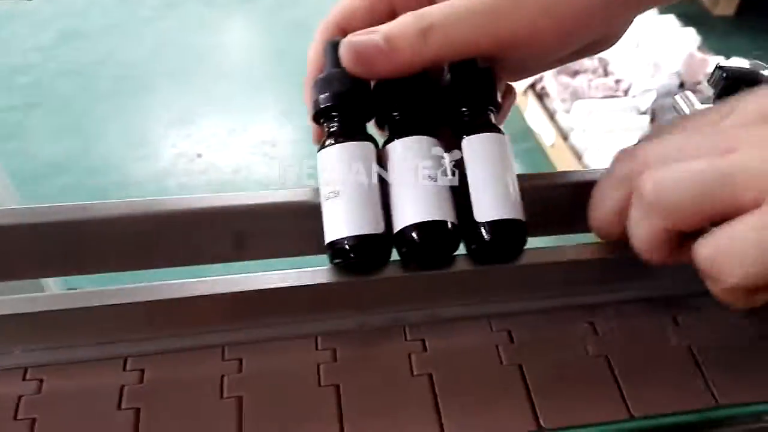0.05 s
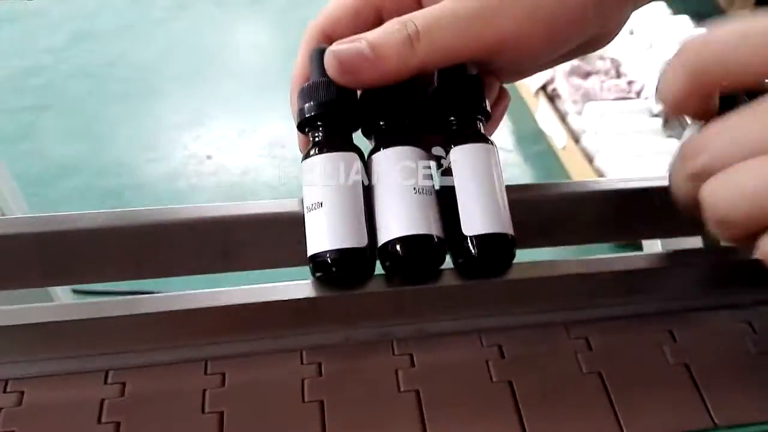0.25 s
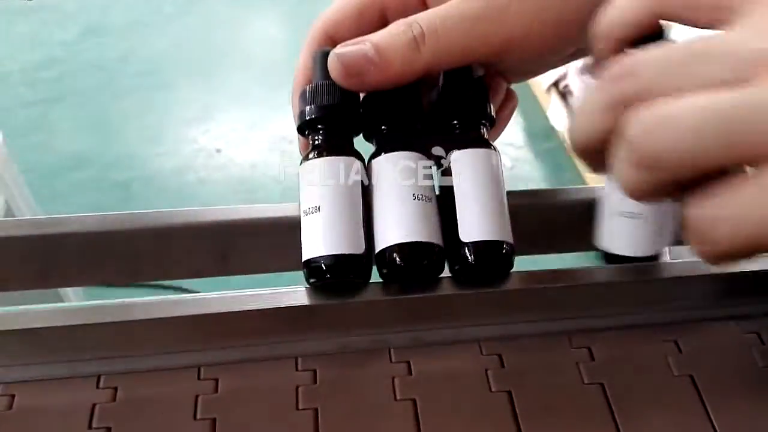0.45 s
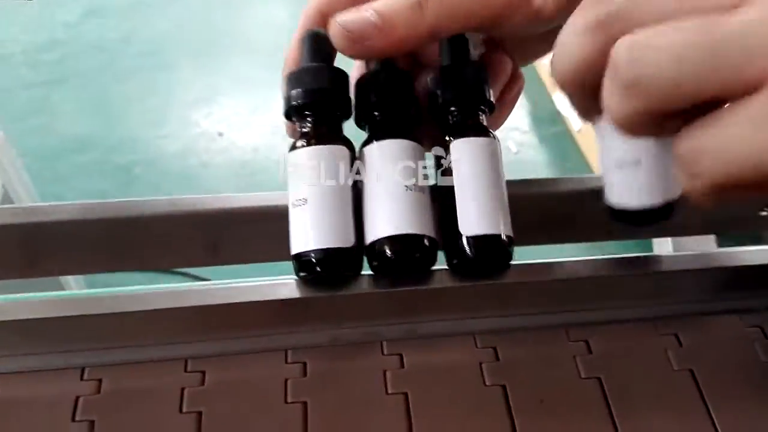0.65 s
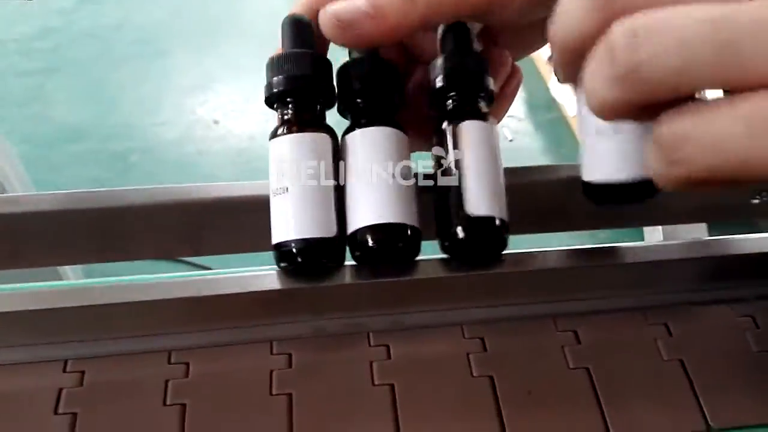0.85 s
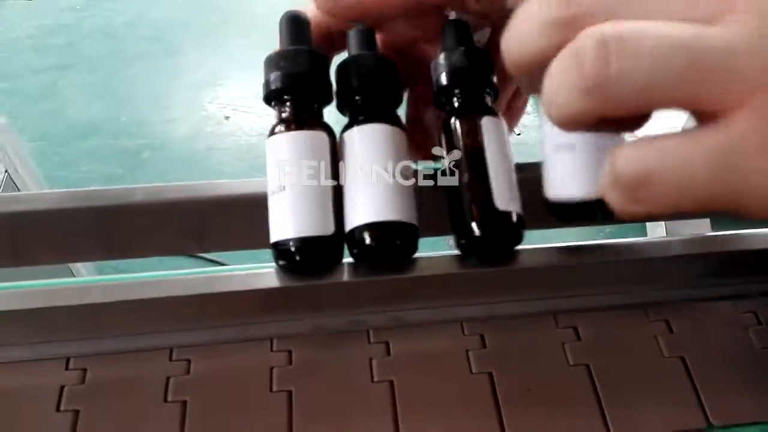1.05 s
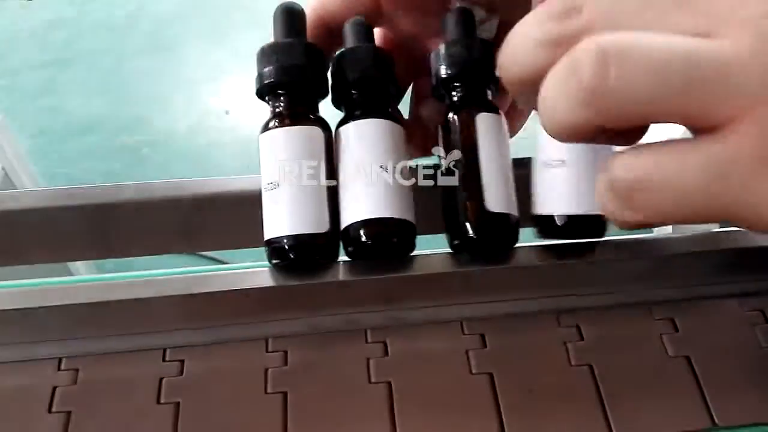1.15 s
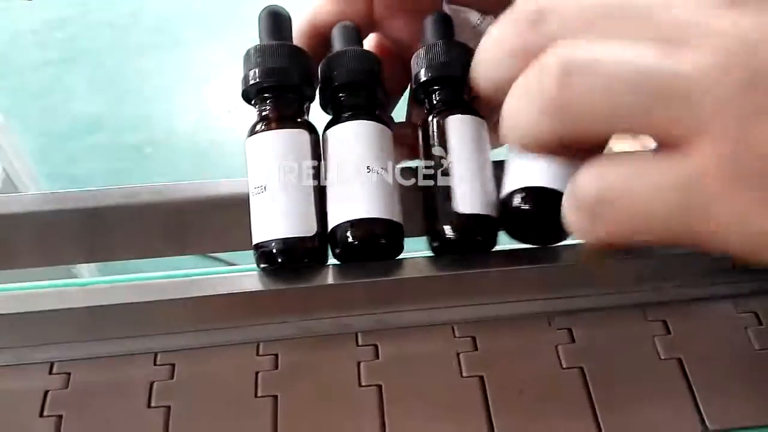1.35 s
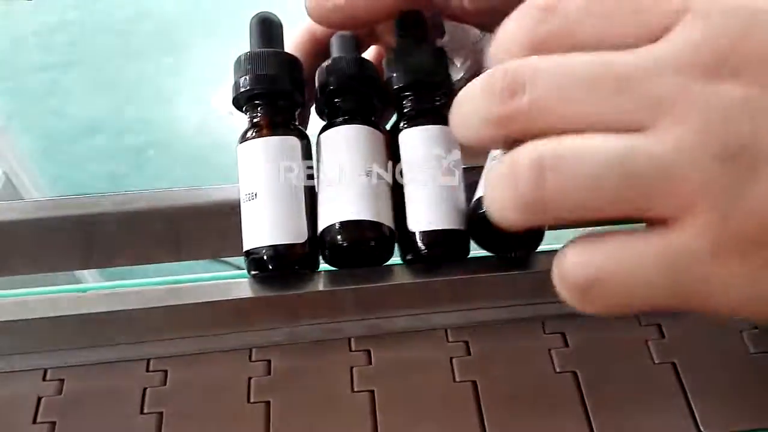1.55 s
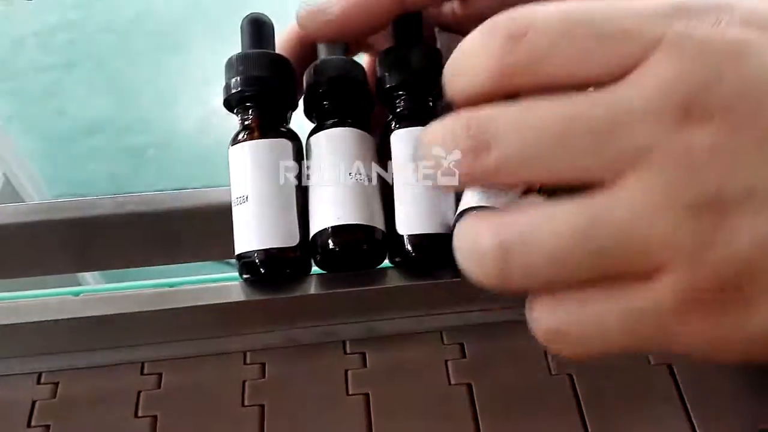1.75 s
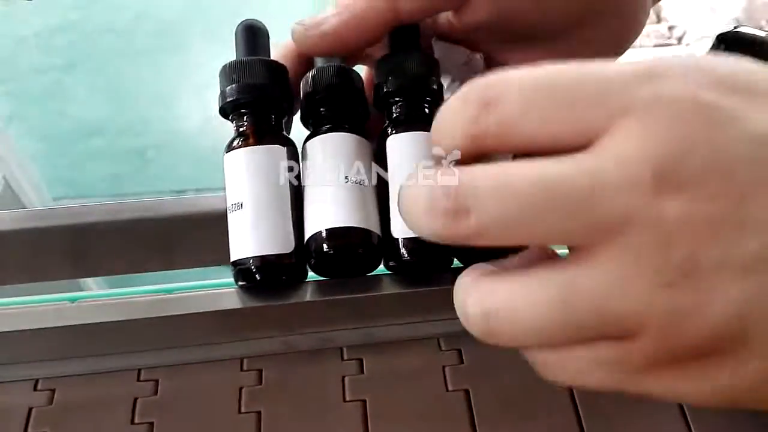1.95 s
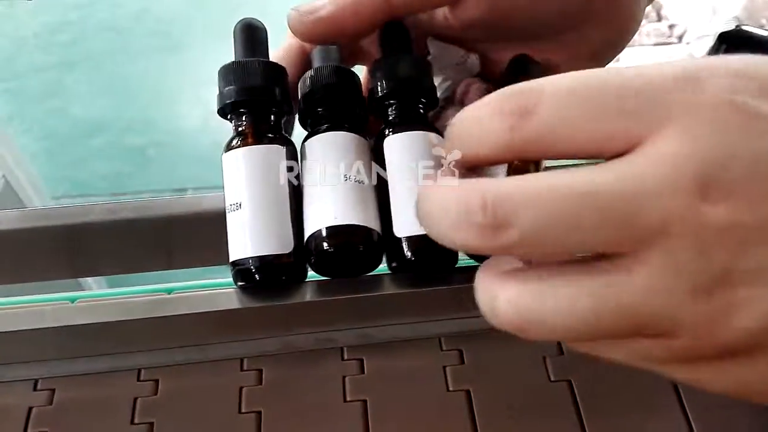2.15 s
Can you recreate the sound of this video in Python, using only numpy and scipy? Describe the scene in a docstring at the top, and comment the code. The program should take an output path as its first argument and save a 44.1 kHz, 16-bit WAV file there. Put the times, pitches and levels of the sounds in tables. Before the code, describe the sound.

Small glass bottles clink close by as they are set on a steel rail, in about ten uneven, briefly ringing contacts with a few soft hand knocks. Machinery hisses and hums throughout the hall, whining briefly near the start.

```python
"""A machine hall, beside a conveyor: small glass dropper bottles are lined up on a steel rail close by.
Machinery hisses, hums and rumbles throughout, with one brief whine. Each bottle contact gives a crack,
a dense clatter and the ringing modes of glass and rail. Hands make a few soft knocks, and a low thump
lies under the first loud clink. The right microphone port hears everything later and muffled."""
import sys
import numpy as np
from scipy import signal
from scipy.fft import rfft, irfft, next_fast_len
from scipy.io import wavfile
from scipy.ndimage import uniform_filter1d, minimum_filter1d, map_coordinates

SR = 44100
rng = np.random.default_rng(int(sys.argv[2]) if len(sys.argv) > 2 else 0)


def wrap_up_sound(samples):
    """Save the sound to the file named by the first command line argument, as 16-bit audio."""
    columns = np.atleast_2d(samples).T
    # keep every value between -1 and 1, then stretch to whole-number steps
    tamed = np.clip(columns, -1, 1)
    steps = np.round(tamed * 32767).astype(np.int16)
    wavfile.write(sys.argv[1], SR, steps)


N = 97020


def amp(db):
    """Decibels to gain."""
    return 10 ** (np.asarray(db) / 20)


def along(points, hz):
    """Interpolate (freq_hz, value) points on a log axis."""
    freq_hz, values = np.transpose(points)
    return np.interp(np.log(hz + 1), np.log(freq_hz + 1), values)


def curves(rows, outside=None):
    """One value per sample for each column after time_s."""
    time_s, *columns = np.transpose(rows)
    return [np.interp(np.arange(N) / SR, time_s, c, left=outside, right=outside) for c in columns]


def wobble(rate_hz):
    """Smooth random curve, rate_hz knots a second."""
    knots = rng.standard_normal(int(N * rate_hz / SR) + 4)
    return map_coordinates(knots, [np.arange(N) * rate_hz / SR])


def filtered(x, response):
    """Apply a frequency response."""
    size = x.shape[-1]
    padded = next_fast_len(size + SR // 8)
    return irfft(rfft(x, padded) * response(np.fft.rfftfreq(padded, 1 / SR)), padded)[..., :size]


def fade(t, t60_s):
    """Exponential decay."""
    return np.exp(-np.log(1000) * t / np.maximum(t60_s, 1e-3))


def rise(t, attack_s):
    """Exponential onset."""
    return 1 - np.exp(-t / attack_s)


def add(track, start_s, sound):
    """Mix a sound into the track."""
    part = track[:, round(start_s * SR):][:, :sound.shape[-1]]
    part += sound[..., :part.shape[1]]


# Likeness of the two ports: freq_hz, correlation
PORT_CORRELATION = [(100, 1), (300, 1), (700, 0.59), (1500, 1), (3000, 0.23), (8000, .05)]

def noise(spectrum_db, size=N):
    """Coloured noise of rms 1, alike at both ports in the bass, unrelated in the treble."""
    def mid_side_gains(hz):
        angle = np.arccos(along(PORT_CORRELATION, hz)) / 2
        return amp(spectrum_db(hz)) * [np.cos(angle), np.sin(angle)]
    mid, side = filtered(rng.standard_normal((2, size)), mid_side_gains)
    ports = np.array([mid + side, mid - side])
    return ports / np.sqrt(np.mean(ports ** 2) + 1e-20)


# Machinery levels: time_s, hiss_db, hum_db
HISS_HUM_LEVELS = [(0, -44, -49.5), (.07, -41, -53), (.13, -36.5, -51), (.2, -39, -51.5), (.5, -38, -46),
                   (.74, -38.5, -40.5), (.83, -40, -44.5), (.88, -38.5, -50), (1.08, -40.5, -48),
                   (1.45, -39.5, -50.5), (1.66, -41.5, -49), (1.73, -40.5, -51.5), (1.8, -39, -43.5),
                   (1.92, -34.5, -42), (2.1, -39, -40), (2.2, -38, -44)]
# Rumble level: time_s, level_db
RUMBLE_LEVEL = [(0, -55), (.45, -56.5), (.8, -61), (1.03, -57), (1.3, -64.5), (1.65, -56.5), (1.8, -75),
                (2.1, -53), (2.2, -48)]
# Noise spectra: freq_hz, relative_db
HISS_SPECTRUM = [(100, -6.5), (400, -19), (700, -1.5), (1100, -0.5), (1450, -1), (2200, -2.5), (3500, -5),
                 (5800, -5), (7000, -14.5), (8200, -24), (10000, -37), (12500, -61), (15000, -66)]
HUM_SPECTRUM = [(100, -56), (200, -7), (320, 1.5), (440, 6), (540, -1.5), (800, -13.5), (2000, -64.5)]
RUMBLE_SPECTRUM = [(15, -0.5), (45, -0.5), (80, -14.5), (150, -27), (300, -9.5), (900, -42)]

def machinery():
    """Machines across the hall: three bands of noise, each wavering in level."""
    hiss_db, hum_db = curves(HISS_HUM_LEVELS)
    rumble_db, = curves(RUMBLE_LEVEL)
    hiss = amp(hiss_db + .6 * wobble(rate_hz=25)) * noise(lambda hz: along(HISS_SPECTRUM, hz))
    hum = amp(hum_db + 1.8 * wobble(rate_hz=14.4)) * noise(lambda hz: along(HUM_SPECTRUM, hz))
    rumble = amp(rumble_db + .97 * wobble(rate_hz=8.9)) * noise(lambda hz: along(RUMBLE_SPECTRUM, hz))
    return hiss + hum + rumble


# Machinery whine: time_s, level_db
WHINE_LEVEL = [(.19, -60), (.215, -35.5), (.275, -31.5), (.293, -53), (0.302, -24.5), (.322, -33.5),
               (.332, -33), (.39, -35), (.53, -38.5), (.62, -49)]

def whine(centre_hz=826, wander_hz=20, flutter_db=1.8):
    """A brief, narrow machine tone, unsteady in pitch and level."""
    level_db, = curves(WHINE_LEVEL, outside=-np.inf)
    gain = amp(level_db + flutter_db * wobble(rate_hz=60))
    pitch_hz = centre_hz + wander_hz * wobble(rate_hz=130)
    return gain * np.sin(2 * np.pi * np.cumsum(pitch_hz) / SR)


def tilt_db(hz, tilt_db_per_oct, pivot_hz=4770):
    """A harder contact favours the high frequencies."""
    return tilt_db_per_oct * np.log2(np.clip(hz, 800, 12000) / pivot_hz)


# Dense modes of glass and steel together: freq_hz, relative_db
CLATTER_SPECTRUM = [(100, 1), (450, -26.5), (1000, -7), (1300, -13.5), (2000, -3), (3300, -2), (6500, -2),
                    (7800, -8.5), (9700, -20.5), (11500, -37.5), (14500, -53)]

def clatter(t, t60_s, crack_db, tilt_db_per_oct):
    """Crowded modes as decaying noise; a faster decay on top is the crack."""
    dense = noise(lambda hz: along(CLATTER_SPECTRUM, hz) + tilt_db(hz, tilt_db_per_oct), size=len(t))
    decay = fade(t, t60_s) + amp(crack_db) * fade(t, t60_s=.014)
    return dense * decay * rise(t, attack_s=.000068) ** 2


def ring(modes, t, tilt_db_per_oct, damping=1.242, scatter_db=1):
    """Damped modes, struck a little differently each time, with a random phase at each port."""
    out = np.zeros((2, len(t)))
    for pitch_hz, relative_db, nominal_t60_s in modes:
        phase = rng.uniform(0, 2 * np.pi, (2, 1))
        gain = amp(relative_db + tilt_db(pitch_hz, tilt_db_per_oct) + scatter_db * rng.standard_normal())
        out += gain * fade(t, nominal_t60_s / damping) * np.sin(2 * np.pi * pitch_hz * t + phase)
    return out * rise(t, attack_s=.00096)


# Four glass rings, the second of two bottles clinking together: pitch_hz, relative_db, nominal_t60_s
GLASS_1 = [(2640, -7, .18), (3205, -1, .15), (3250, 1, .14), (3930, -10, .23), (5248, -1, .22),
           (6380, -7, .2)]
GLASS_2 = [(1916, -12, .22), (2931, -13, .43), (3914, -9, .3), (4498, -10, .27), (4709, -11, .51),
           (5171, -5, .28), (5372, -7, .2), (5550, -5, .28), (5692, -8, .33), (5991, -2, .24),
           (6243, -7, .85), (6294, -16, .9), (6502, 1, .22), (6768, -1, .2), (6932, -3, .26),
           (7101, -8, .28), (7178, -8, .21), (8137, -10, .2), (8703, -15, .2), (9621, -21, .22),
           (10100, -24, .16), (11422, -30, .21), (12400, -33, .14), (13200, -33, .26)]
GLASS_3 = [(1100, -13, .17), (1897, -6, .2), (2904, -1, .18), (3520, -1, .15), (3588, -3, .16),
           (3698, -11, .3), (3985, -4, .25), (4015, -9, .35), (4743, -5, .27), (4845, -13, .35),
           (5787, -10, .22), (6388, 0, .17), (6517, -1, .17), (7671, -14, .2), (9695, -17, .16)]
GLASS_4 = [(2895, 0, .15), (3699, -4, .24), (5492, -5, .2), (6050, 0, .17), (7146, -3, .17),
           (8290, -9, .15), (9720, -12, .12), (10330, -20, .16)]
GLASS_MODES = {"first": GLASS_1, "second": GLASS_2, "third": GLASS_3, "fourth": GLASS_4}
# Steel rail: pitch_hz, relative_db, nominal_t60_s
RAIL_MODES = [(1420, -12, .28), (1916, -6, .28), (1985, -5, .2), (2945, -2, .26), (3526, -7, .18),
              (3690, -9, .28), (4092, -1, .3), (4770, -7, .3), (5185, -5, .25), (5545, -1, .28),
              (5693, 0, .28)]
# Contacts: start_s, clatter_db, crack_re_clatter_db, tilt_db_per_oct, clatter_t60_s,
# glass_db, rail_db, glass_ring
CONTACTS = [ (0.2099, -24, -1.5, -0.5, 0.19, -22, -39, "first"),
            (.356, -11.5, -8, .5, 0.18, -11, -18.5, "second"),
            (0.601, -29, -6, -3, .15, -29, -29.5, "first"),
            (0.608, -18, -13, -0.5, 0.17, -25, -36, "first"),
            (1.1322, -18, -14, 2, 0.3, -31, -14.5, "second"),
            (1.142, -14, -19, 0.5, 0.23, -17.5, -18.5, "second"),
            (1.210, -33, -8, -5, 0.18, -20.5, -24.5, "fourth"),
            (1.2305, -12.5, 16, -0.5, 0.21, -52, -19.5, "second"),
            (1.246, -17, -9, -2, 0.14, -17, -27, "third"), (1.321, -33, -19, -3.5, 0.39, -30, -34, "third"),
            (1.5294, -16.5, 1.5, 1, 0.19, -15, -32, "third"),
            (1.8026, -16, -11, 0, 0.22, -15.5, -34, "third"),
            (1.9666, -20, -2, 3.5, .16, -23, -32, "fourth"),
            (2.087, -30, -4, -6, 0.093, -53, -37, "fourth"), (2.1017, -27, 3, -5, 0.2, -59, -33, "fourth"),
            ]

def clinks(low_cut_hz=330):
    """Each contact clatters and rings the glass and the rail; small bottles radiate little bass."""
    out, t = np.zeros((2, N)), np.arange(SR * 3 // 4) / SR
    for start_s, clatter_db, crack_db, tilt_db_per_oct, t60_s, glass_db, rail_db, glass_ring in CONTACTS:
        impact = amp(clatter_db) * clatter(t, t60_s, crack_db, tilt_db_per_oct)
        glass = amp(glass_db) * ring(GLASS_MODES[glass_ring], t, tilt_db_per_oct)
        rail = amp(rail_db) * ring(RAIL_MODES, t, tilt_db_per_oct)
        add(out, start_s, in_hall(impact + glass + rail, wet_db=-19))
    return signal.sosfilt(signal.butter(3, low_cut_hz, "highpass", fs=SR, output="sos"), out)


# Knock and thump modes: start_s, level_db, pitch_hz, t60_s, attack_s
KNOCK_MODES = [(0.2821, -24, 79, 0.026, 0.00047), (0.2838, -14, 418, 0.0049, 0.00034),
               (.358, -33, 53.4, 0.19, 0.012), (1.8714, -21, 198, 0.07, 0.004),
               (1.8771, -2.5, 665, 0.02, 0.00059), (1.877, -29, 139, .06, 0.002),
               (1.906, -16, 692, 0.028, 0.0015)]

def knocks():
    """Soft hand knocks and a thump under the first loud clink: low, heavily damped modes."""
    out, t = np.zeros((2, N)), np.arange(SR // 2) / SR
    for start_s, level_db, pitch_hz, t60_s, attack_s in KNOCK_MODES:
        push = -amp(level_db) * np.sin(2 * np.pi * pitch_hz * t) * fade(t, t60_s) * rise(t, attack_s)
        add(out, start_s, in_hall(np.array([push, push]), wet_db=-11))
    return out


# Hall decay: freq_hz, t60_s
HALL_DECAY = [(100, 0.26), (700, 0.55), (2000, 0.75), (6000, 0.54), (12000, 0.24)]

def in_hall(sound, wet_db):
    """The sound plus a fresh hall tail, each frequency dying at its own rate."""
    hz, t, bands = signal.stft(rng.standard_normal((2, SR * 3 // 4)), SR, nperseg=256)
    _, tail = signal.istft(bands * fade(t, along(HALL_DECAY, hz)[:, None]), SR, nperseg=256)
    wet = signal.fftconvolve(sound, tail / np.linalg.norm(tail[0]), axes=1)
    return sound + amp(wet_db) * wet[:, :sound.shape[1]]


def scene():
    """Everything that arrives at the two ports."""
    return clinks() + knocks() + machinery() + whine()


# Right port against the left: freq_hz, gain_db
RIGHT_PORT_RESPONSE = [(30, 0), (150, 0), (250, -.5), (420, -3), (720, -10), (1300, -10), (2200, -11),
                       (3300, -11), (5400, -21), (9000, -24), (15000, -18)]
# Top-end tone (slight dip, lift near 14.5 kHz, cut-off): freq_hz, gain_db
TOP_END_TONE = [(10500, 0), (12500, -4), (14500, 9), (15300, -28)]

def record(dry, right_lag_s=.000652, ceiling_db=-.1, top_hz=15300):
    """Late, muffled right port; then top-end tone shaping, peak limiter, band limit."""
    muffled = lambda hz: amp(along(RIGHT_PORT_RESPONSE, hz))
    right = filtered(dry[1], lambda hz: muffled(hz) * np.exp(-2j * np.pi * hz * right_lag_s))
    ports = filtered(np.array([dry[0], right]), lambda hz: amp(along(TOP_END_TONE, hz)))
    needed_gain = np.minimum(1, amp(ceiling_db) / (np.abs(ports).max(axis=0) + 1e-9))
    smooth_gain = uniform_filter1d(minimum_filter1d(needed_gain, size=129), size=129)
    return filtered(ports * smooth_gain, lambda hz: hz < top_hz)


dry = scene()
out = record(dry)
wrap_up_sound(out)
```